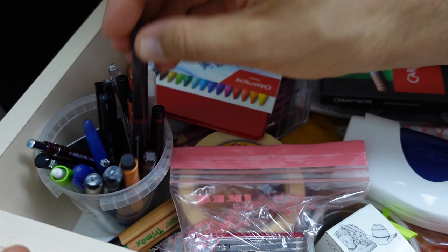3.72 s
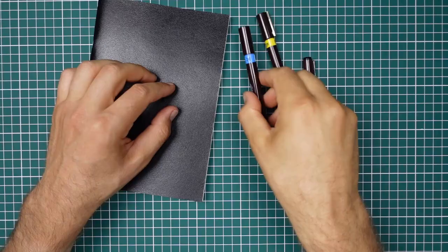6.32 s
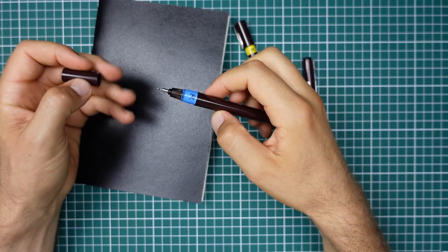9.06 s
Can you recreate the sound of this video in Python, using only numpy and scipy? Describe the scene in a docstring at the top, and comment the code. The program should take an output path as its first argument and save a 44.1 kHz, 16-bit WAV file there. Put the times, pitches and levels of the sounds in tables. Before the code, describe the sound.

Close, dry clicks and scrapes come in uneven bursts as plastic pens are stirred in a tub and drawn out. Then, at a desk with a steady hum and hiss, a hand brushes a notebook and a pen lands with a knock. A soft thud and a deep bump of the microphone stand follow. Last come the short rasps and sharp clicks of a twisted pen cap and a faint squeaky nudge across a mat.

```python
"""A hand rummages through pens in a plastic tub in a drawer: each stir scrapes the barrels and shoves
the tub, and pens clack together. The scene cuts to a desk with a bed of hum and hiss. A hand pats and
rubs a notebook, a pen is set down, the heel of the hand thuds and a bump sets the microphone stand
swaying. A technical pen's cap rasps and clicks on its thread; last, the pen is nudged over the cutting
mat with a squeak. Gain control ducks the mix under the loudest moments."""
import sys
import numpy as np
from scipy import signal
from scipy.fft import rfft, irfft
from scipy.io import wavfile
from scipy.ndimage import uniform_filter1d

SR = 44100
rng = np.random.default_rng(int(sys.argv[2]) if len(sys.argv) > 2 else 0)


def dump(signal):
    """Clip the signal to [-1, 1] and save it as 16-bit WAV at the path in sys.argv[1]."""
    limited = np.clip(np.atleast_2d(signal).T, -1, 1)
    pcm = np.round(limited * 32767).astype(np.int16)
    wavfile.write(sys.argv[1], SR, pcm)


N = 428211
TIME = np.arange(N) / SR
DESK_FROM_S, THUD_S, JOLT_S = 6.36, 7.109, 7.708

# pens knocking together: t/s, level/dB before the mix trims, main ring f/Hz, tick and tub offsets/dB
CLACKS = [(0.8998, -21.5, 3260, -14.5, -35), (0.9525, -30.5, 2260, -16, -36), (1.071, -31, 3880, -7, -27),
          (1.1072, -29, 4950, -16, -22), (1.1403, -32.5, 2580, -4, -7), (1.1528, -27, 2230, -10, -23),
          (1.1667, -26.5, 2560, -15, -33), (1.3817, -33, 2580, -8.5, -31), (1.41, -40.5, 4790, -5.5, -13),
          (1.8035, -31, 2480, -30, -15), (1.942, -29, 2600, -14, -15.5), (1.972, -34, 3800, -21, -24),
          (1.9904, -25.5, 3770, -13, -16), (2.0421, -19, 3020, -18.5, -21), (2.074, -28, 2450, -23, -17),
          (2.1628, -28, 2980, -25.5, -30), (2.2361, -31.5, 3260, -11.5, -22),
          (2.406, -31.5, 3360, -13.5, -19), (2.429, -34.5, 2200, -8, -15),
          (2.446, -27.5, 3260, -14.5, -28.5), (2.458, -19.5, 2180, -12, -24),
          (2.4698, -18.5, 3300, -21, -30), (2.487, -26, 4450, -8, -29), (2.51, -7, 3570, -18.5, -24),
          (2.523, -18.5, 3100, -15, -20), (2.586, -24.5, 4700, -14.5, -28), (2.6195, -31.5, 2150, -12, -24),
          (3.0009, -24.5, 4300, -18.5, -20), (3.13, -29.5, 2740, -20, -21),
          (3.1561, -29, 4000, -16.5, -9.5), (3.3892, -23.5, 4100, -19, -32),
          (3.4816, -26.5, 2740, -8.5, -18), (3.5221, -15.5, 3700, -9, -29), (3.5955, -21.5, 4660, -6, -18),
          (3.763, -25.5, 3060, -16, -20), (3.7792, -25, 3200, -17.5, -22.5),
          (3.8172, -7.5, 3000, -24.5, -22.5), (3.8347, -19.5, 2970, -10, -16.5),
          (3.9137, -13.5, 3120, -30, -11.5), (3.929, -11.5, 1990, -30.5, -16.5),
          (3.9418, -10.5, 3130, -26, -19.5), (3.9707, -19.5, 8860, 0, -21.5), (3.998, -28, 9000, -3, -25),
          (4.0465, -19, 8200, -2.5, -31), (4.0946, -19, 4480, -3, -24), (4.123, -20, 4890, -10, -20),
          (4.2884, -22.5, 4470, -18.5, -23.5), (4.572, -51, 4770, 0, -26), (4.81, -38, 2200, -13.5, -19.5),
          (5.1504, -26.5, 3940, -7, -21.5), (5.169, -26.5, 2440, -4, -22.5),
          (5.217, -26.5, 2080, -3.5, -27.5), (5.243, -17.5, 3270, -16, -28.5),
          (5.2777, -6, 2920, -14.5, -19.5), (5.309, -34.5, 4150, -4, -13),
          (5.3423, -15.5, 2470, -31, -14.5), (5.3699, -29.5, 2260, -37, -9.5),
          (5.4936, -27, 2020, -18, -16), (5.5996, -31.5, 2040, -15.5, -23.5),
          (5.7295, -31.5, 3880, -16, -11), (5.8493, -35, 2480, -18, -22), (5.8569, -37.5, 7170, -7, -13.5),
          (6.2275, -24.5, 3450, -20.5, -32.5)]
# modes of a pen barrel, damped by its neighbours: f/Hz, level/dB, t60/s
BARREL_MODES = [(2150, -6, .005), (3150, -1, .007), (4450, -2, .005), (5600, -2.5, .005), (7400, -1, .005),
                (9150, 1, .006), (12000, 0, .003)]
# modes of the tub and drawer: f/Hz, level/dB, t60/s
TUB_MODES = [(260, -4, .028), (400, 0, .017), (530, 1.5, .014), (740, -1.5, .012), (918, -5, .02)]
# the hand stirring: firmest t/s, attack/s, release/s, scrape level/dB, shove level/dB
STIRS = [(0.906, 0.015, 0.26, -55, -73), (1.154, 0.0487, 0.17, -52, -57.5),
         (1.375, 0.029, 0.055, -49.5, -48.5), (1.832, 0.014, .02, -44.5, -43.5),
         (2.001, 0.06, 0.18, -44.5, -47), (2.255, 0.0083, 0.031, -49, -52), (2.49, 0.08, 0.09, -42.5, -51),
         (3.006, 0.032, .04, -42.5, -49), (3.158, 0.0096, 0.025, -51.5, -52.5),
         (3.535, 0.039, 0.051, -39.5, -34.5), (3.725, 0.027, 0.3, -46, -64),
         (3.83, .015, 0.047, -27, -35.5), (3.933, 0.03, 0.011, -25, -34.5),
         (4.02, 0.018, 0.029, -34.5, -42), (4.122, 0.025, 0.03, -35.5, -49.5),
         (4.273, 0.051, .035, -48, -50), (5.275, 0.19, 0.19, -45, -58)]
# tone of the scraping: f/Hz, level/dB
SCRAPE_EQ = [(90, -55.5), (260, 1.5), (450, -13.5), (900, -2.5), (1350, -2), (2100, 2.5), (3100, 1),
             (5000, 1), (9000, -3.5), (16000, -14.5)]
# a barrel drawn out: fastest t/s, attack/s, release/s, hiss level/dB, squeal f/Hz, squeal level/dB
SLIDES = [(1.6, 0.14, 0.12, -59, 7300, -64), (5.125, 0.027, .04, -54, 9150, -45),
          (5.22, 0.057, 0.053, -44, 9600, -52)]
# turns of the cap: tightest t/s, attack/s, rasp level/dB, hollow rub level/dB
TWISTS = [(8.11, 0.027, -47.5, -62), (8.183, 0.038, -39.5, -49), (8.449, 0.052, -40, -46),
          (8.495, 0.031, -42.5, -59), (8.752, 0.024, -51.5, -50)]
# the cap catching on its thread: t/s, level/dB
CAP_CLICKS = [(7.873, -32.5), (7.944, -26), (8.182, -22), (8.4932, -14), (8.5009, -12.5), (8.8326, -9),
              (8.843, -12), (8.8478, -17.5)]
# modes of the technical pen: f/Hz, level/dB, t60/s
PEN_MODES = [(1240, -5, 0.015), (1970, -12, 0.0091), (4030, 6.5, 0.002), (4440, 7, 0.0065),
             (6900, -2, 0.0036), (7450, -5, 0.0063), (10000, -27, 0.006), (11300, -3.5, 0.002)]
# a pen landing and rattling on the desk: t/s, level/dB
KNOCKS = [(6.9896, -13), (7.0015, -30.5), (7.0127, -21), (7.586, -43.5)]
# modes of the desk top: f/Hz, level/dB, t60/s
DESK_MODES = [(125.5, -11.5, 0.39), (208, -14, 0.29), (297.5, -14, 0.26), (701, -16, 0.099),
              (897, -11, 0.12), (1015, -11, 0.042), (1270, -3, 0.026), (1410, -15, 0.036)]
# envelope of the pen dragging over the mat: t/s, level/dB
DRAG_FADER = [(9.5, -92), (9.55, -42.5), (9.572, -29.5), (9.59, -61), (9.63, -39), (9.67, -52),
              (9.71, -36.5)]
# a hand rubbing the notebook: fastest t/s, attack/s, release/s, hiss level/dB, hollow rub level/dB
GLIDES = [(6.671, 0.031, 0.0078, -42.5, -52), (6.71, 0.026, 0.094, -80, -53.5),
          (6.97, 0.091, 0.032, -76, -55)]
# desk modes under the heel of the hand: f/Hz, level/dB, t60/s
THUD_MODES = [(99, 10.5, 0.23), (124.5, 6, 0.38)]
# modes of the swaying microphone stand: f/Hz, level/dB, t60/s
STAND_MODES = [(22, 0, .9), (30, -6, 2.4), (52, -19, .9), (130, -24, .7)]
# room tone at the drawer: f/Hz, level/dB
DRAWER_AIR_EQ = [(20, -33.5), (53, -13), (87, -10), (120, -3.5), (620, -12), (1260, -17.5), (6380, -20.5),
                 (14400, -24), (16000, -28.5)]
# its fader, sinking as the hand stops: t/s, level/dB
DRAWER_AIR_FADER = [(0, -2), (5.4, 1), (5.7, -6), (6.4, -5)]
# room tone at the desk: f/Hz, level/dB
DESK_AIR_EQ = [(15, -69), (25, -8.5), (40, -2.5), (59, 4), (87, -14), (161, -15), (335, -25.5),
               (1200, -34.5), (6920, -31.5), (14800, -36), (16000, -41)]
# its fader, swelling in: t/s, level/dB
DESK_AIR_FADER = [(6.3, -8.5), (6.62, -3.5), (9.72, -3)]


def clacks(chatter_s=.0033, settle_s=.0053):
    """Each contact chatters for a few ms, ringing its own barrel and the tub under it."""
    out, t = np.zeros(N), seconds(.15)
    pressure = np.exp(-(t / chatter_s) ** 2) + .56 * np.exp(-t / settle_s)
    for at, db, hz, tick_db, tub_db in CLACKS:
        contact, rasp = rng.standard_normal((2, len(t))) * pressure
        barrel_ring = ring(BARREL_MODES, .02, detune=.05, scatter_db=2.5) + ring([(hz, 5.5, .006)], .02)
        barrel = unit(through(contact, barrel_ring)) + .74 * unit(band(rasp, 1400, 8000, order=1))
        tub_ring = ring(TUB_MODES, .12, detune=.091, scatter_db=7)
        tub = unit(through(contact, tub_ring)) + .5 * unit(band(rasp, 250, 1000))
        top_hz = 18000 * undb(tick_db / 9)  # softer contacts are duller
        add(out, at, at_level(band(barrel, 1950, 5500, order=4), db - 11))
        add(out, at, at_level(band(barrel, 5500, top_hz, order=3), db + tick_db - 1))
        add(out, at, at_level(band(tub, 205, 1200, order=5), db + tub_db - 2))
    return out


def rummage(pressed_from_db=-61.5, full_grind_db=-30):
    """Barrels scrape, tick and rumble in the tub; pressed hard, they grind at their low resonances."""
    force = sum(undb(db) * gesture(at, attack, release) for at, attack, release, db, _ in STIRS)
    pressed = force / (force + undb(pressed_from_db))
    # a light touch slides smoothly, a firm one catches and crackles
    catching = crunch(rate=220, spread_db=6, burst_s=.0032, smooth=.2)
    rubs = np.sqrt(pressed) * catching + np.sqrt(1 - pressed) * rng.standard_normal(N)
    tub = unit(band(through(rubs, ring(TUB_MODES, .25)), 150, 1300))
    grind = np.minimum(force / undb(full_grind_db), 1) * unit(band(rubs, 2650, 3550))
    scrape = undb(-1.5) * shape(rubs, SCRAPE_EQ)
    ticks = undb(-5) * pressed * shape(jostle(), SCRAPE_EQ)
    return force * (scrape + ticks + undb(-13) * tub + undb(-4) * grind)


def jostle(pens=5):
    """Neighbouring pens touch in small dry ticks, each with its own short resonances."""
    ticks = (through(slips(rate=17, spread_db=4), burst(.012, decay_s=.0017)) for _ in range(pens))
    return unit(sum(map(unit, ticks)))


def slides(width=.025, rise_per_s=.1):
    """A drawn barrel hisses through the resonant gap between pens while a thin squeal drifts upward."""
    rubs = crunch(rate=600, spread_db=3, burst_s=.002, smooth=1)
    out = np.zeros(N)
    for at, attack, release, hiss_db, hz, squeal_db in SLIDES:
        gap_ring = burst(.01, decay_s=.0011)
        hiss = shape(through(rubs, gap_ring), [(1500, -13), (6000, .5), (11500, -2), (16000, -4)])
        whistle = unit(band(rng.standard_normal(N), hz * (1 - width), hz * (1 + width)))
        squeal = np.interp(TIME + rise_per_s * (TIME - at) ** 2 / 2, TIME, whistle)
        out += gesture(at, attack, release) * (undb(hiss_db) * hiss + undb(squeal_db) * squeal)
    return out


def shoves():
    """The tub judders hollowly on the drawer's floor with each stir."""
    judder = unit(band(crunch(rate=91, spread_db=5.5, burst_s=.0047, smooth=.15), 185, 350))
    return judder * sum(undb(db - 2) * gesture(at, attack, release) for at, attack, release, _, db in STIRS)


def cap(release_s=.013):
    """The cap rubs round its thread, singing at the barrel's main mode, and snaps with no bass."""
    rubs = crunch(rate=330, spread_db=3, burst_s=.0026, smooth=.34)
    choked = .5 * unit(through(rubs, ring(PEN_MODES, .002)))  # gripping fingers cut the ring short
    squeak = undb(-5.5) * unit(band(rubs, 4100, 4570))
    hiss = undb(-3) * unit(band(rubs, 5500, 10500, order=1))
    rasp = choked + squeak + hiss
    hollow = unit(band(rubs, 1100, 2050))
    twists = sum(gesture(at, attack, release_s) * (undb(rasp_db) * rasp + undb(rub_db) * hollow)
                 for at, attack, rasp_db, rub_db in TWISTS)
    snaps = strikes(CAP_CLICKS, PEN_MODES, .08, crack=.16, crack_s=.0042)
    return twists + undb(2) * band(snaps, 1230, 9900)


def knocks(tick_s=.006, clatter_s=.04):
    """Hard plastic hits the desk: a sharp tick, the top's ring and a dense, dull clatter."""
    out, t = strikes(KNOCKS, DESK_MODES, .4, crack=.02, crack_s=.002), seconds(.3)
    for at, db in KNOCKS:
        tick, clatter = rng.standard_normal((2, len(t)))
        add(out, at, undb(db - 23) * unit(band(tick, 1300, 5000, order=1)) * np.exp(-t / tick_s))
        add(out, at, undb(db - 14) * unit(band(clatter, 220, 1020, order=3)) * np.exp(-t / clatter_s))
    return out


def nudge():
    """The pen drags over the mat, grips for a moment and squeaks."""
    rubs = crunch(rate=440, spread_db=2.5, burst_s=.0061, smooth=.57)
    drag_eq = [(130, -33), (300, -4.5), (520, -5.5), (1000, -1.5), (1260, -14), (1800, -11), (16000, -32)]
    squeak = undb(-31) * swell(at=9.573, width_s=.0092) * unit(band(rubs, 1100, 1510))
    return fader(DRAG_FADER) * shape(rubs, drag_eq) + squeak


def notebook():
    """A palm pats the notebook, then glides over its cover: skin hisses and the pages rub hollowly."""
    palm = noise([(120, 4), (260, 13), (420, -1), (700, 3), (1230, 2.5), (1700, -12), (5000, -36)])
    pat = undb(-45) * gesture(6.365, .0061, .048) * palm
    hiss = noise([(1100, -12), (2500, -20), (3600, 2), (16000, -13)])
    rub = noise([(200, -34), (430, 4), (580, 7), (1100, -8), (3000, -35)])
    return pat + sum(gesture(at, attack, release) * (undb(hiss_db) * hiss + undb(rub_db) * rub)
                     for at, attack, release, hiss_db, rub_db in GLIDES)


def bump(at, db, modes, push_s):
    """A soft, slow push that only wakes low modes."""
    out = np.zeros(N)
    body = through(ring(modes, 1.7, signed=False), np.hanning(int(push_s * SR)))
    add(out, at, undb(db) * body / np.abs(body).max())
    return out


def stand_shudder():
    """The jolted microphone stand shudders with a dying rumble."""
    rumble = noise([(60, -6), (120, 1), (170, -10.5), (450, -23.5), (4000, -50.5)])
    return undb(-26) * gesture(JOLT_S + .03, .015, .15) * rumble


def forearm():
    """A forearm brushes the desk just before the stand is jolted."""
    brush = noise([(120, -39), (340, 12), (600, -12), (3000, -35)])
    return undb(-35.5) * swell(at=7.685, width_s=.025) * brush


def drawer_air():
    """A faint bed of room tone under the rummaging."""
    return undb(-64) * fader(DRAWER_AIR_FADER) * noise(DRAWER_AIR_EQ)


def desk_air():
    """A bed of hiss and low, slightly unsteady hum."""
    hum = noise([(50, -60), (52.5, -15), (53.8, 0), (55, -15), (58, -60), (300, -120)])
    return undb(-39.5) * fader(DESK_AIR_FADER) * noise(DESK_AIR_EQ) + undb(-53) * hum


def room(x, t60, wet_db, lo_hz, hi_hz):
    """A diffuse tail of reflections after a 3 ms pre-delay."""
    t = seconds(.7)
    tail = band(rng.standard_normal(len(t)), lo_hz, hi_hz, order=1) * undb(-60 * t / t60) * (t > .003)
    return undb(wet_db) * through(x, tail / np.sqrt(np.sum(tail ** 2)))


def strikes(rows, modes, length, crack, crack_s):
    """Sharp blows on one object, each with a brief crack of contact noise."""
    out = np.zeros(N)
    for at, db in rows:
        body = ring(modes, length, detune=.02, scatter_db=.5)
        hit = body / np.abs(body).max() + crack * burst(length, crack_s)
        add(out, at, undb(db) * hit / np.abs(hit).max())
    return out


def ring(modes, length, detune=0., scatter_db=0., signed=True):
    """Decaying modes; where the blow lands changes their pitch, strength and sign."""
    hz, db, t60 = np.transpose(modes)[:, :, None]
    pitch, strength, polarity = rng.standard_normal((3, len(modes), 1))
    t = seconds(length)
    size = undb(db + scatter_db * strength) * (np.sign(polarity) if signed else 1)
    partials = np.sin(2 * np.pi * hz * (1 + detune * pitch) * t)
    return np.sum(size * partials * undb(-60 * t / t60), axis=0)


def crunch(rate, spread_db, burst_s, smooth):
    """Friction that catches in short bursts of noise, over a smooth share; rms near 1."""
    catches = through(np.abs(slips(rate, spread_db)), np.exp(-seconds(.03) / burst_s))
    grip = unit(catches) + smooth
    return rng.standard_normal(N) * grip / np.sqrt(uniform_filter1d(grip ** 2, int(.04 * SR)))


def slips(rate, spread_db):
    """Stick-slip friction: tiny, very unequal impulses, about `rate` a second."""
    slipping = rng.random(N) < rate / SR
    size = undb(spread_db * np.minimum(rng.exponential(size=N), 4))
    return unit(slipping * size * np.sign(rng.standard_normal(N)))


def gesture(at, attack_s, release_s):
    """Effort swells smoothly up to one moment, then dies away."""
    return np.exp(np.where(TIME < at, -((TIME - at) / attack_s) ** 2, (at - TIME) / release_s))


def swell(at, width_s):
    return np.exp(-((TIME - at) / width_s) ** 2)


def fader(rows):
    """Gain riding along (t/s, level/dB) points; silent outside them."""
    return undb(np.interp(TIME, *np.transpose(rows), left=-200, right=-200))


def shape(x, eq):
    """EQ a sound along (f/Hz, level/dB) points; rms 1."""
    hz, db = np.transpose(eq)
    bins = np.maximum(np.arange(N // 2 + 1) * SR / N, 1)
    return unit(irfft(rfft(x) * undb(np.interp(np.log(bins), np.log(hz), db)), N))


def noise(eq):
    return shape(rng.standard_normal(N), eq)


def burst(length, decay_s):
    t = seconds(length)
    return rng.standard_normal(len(t)) * np.exp(-t / decay_s)


def band(x, lo_hz, hi_hz, order=2):
    sos = signal.butter(order, [lo_hz, min(hi_hz, .49 * SR)], "band", fs=SR, output="sos")
    return signal.sosfilt(sos, x)


def through(x, response):
    return signal.fftconvolve(x, response)[:len(x)]


def at_level(x, db, window_s=.008):
    """Set the rms level of a hit's transient."""
    return x * undb(db) / np.sqrt(np.mean(x[:int(window_s * SR)] ** 2))


def add(track, at, sound):
    i = int(at * SR)
    track[i:i + len(sound)] += sound[:N - i]


def undb(db):
    return 10 ** (np.asarray(db) / 20)


def unit(x):
    return x / np.sqrt(np.mean(x ** 2))


def seconds(length):
    return np.arange(int(length * SR)) / SR


def scene():
    """The drawer, then a hard cut to the desk, each with its own close reflections; mono."""
    drawer = clacks() + rummage() + slides() + shoves()
    drawer += room(drawer, t60=.1, wet_db=-17, lo_hz=220, hi_hz=9500) + drawer_air()
    desk = cap() + nudge() + forearm() + stand_shudder() + knocks() + notebook()
    desk += room(desk, t60=.15, wet_db=-16, lo_hz=153, hi_hz=3080)
    desk += bump(THUD_S, -16.5, THUD_MODES, push_s=.0071)
    desk += bump(JOLT_S, -3.5, STAND_MODES, push_s=.0085)
    return np.where(TIME < DESK_FROM_S, drawer, desk + desk_air())[None]


def record(dry, threshold_db=-19, release_db_per_s=14, top_hz=16000):
    """Gain control ducks loud passages and recovers slowly; peaks are soft-clipped, the top is cut."""
    level_db = 10 * np.log10(np.abs(uniform_filter1d(dry[0] ** 2, int(.04 * SR))) + 1e-12)
    recovery = release_db_per_s * TIME
    duck_db = np.maximum.accumulate(np.maximum(level_db - threshold_db, 0) + recovery) - recovery
    duck_db = signal.lfilter(*signal.butter(1, 7, fs=SR), duck_db)  # attack of a few tens of ms
    rounded = .8 * np.tanh(dry * undb(-duck_db) / .8)
    return signal.sosfilt(signal.ellip(10, .2, 70, top_hz, fs=SR, output="sos"), rounded)


dry = scene()
out = record(dry)
dump(out)
```